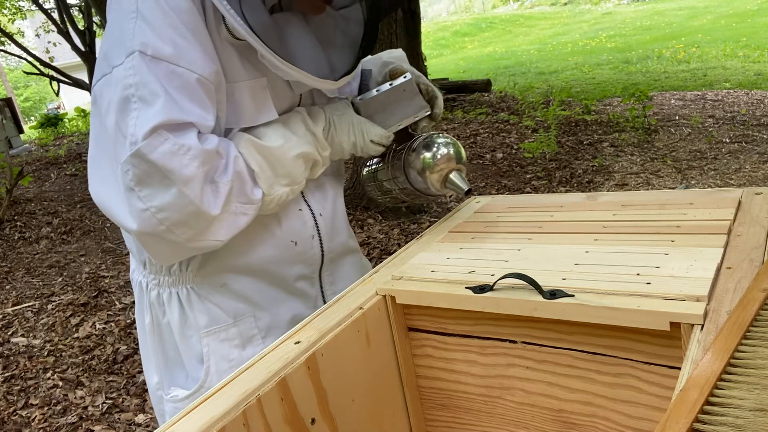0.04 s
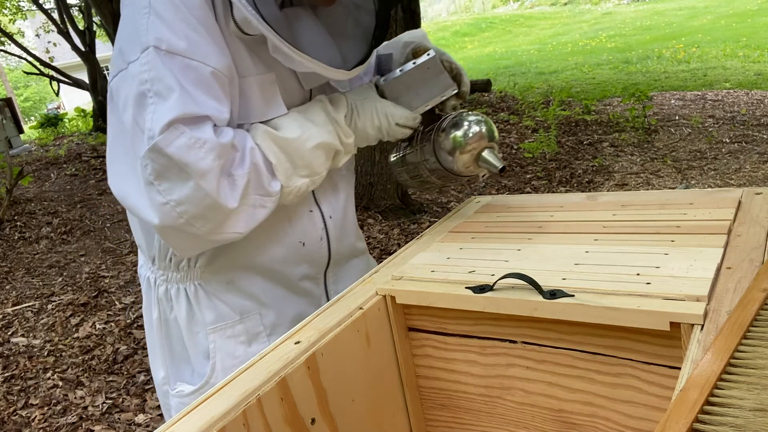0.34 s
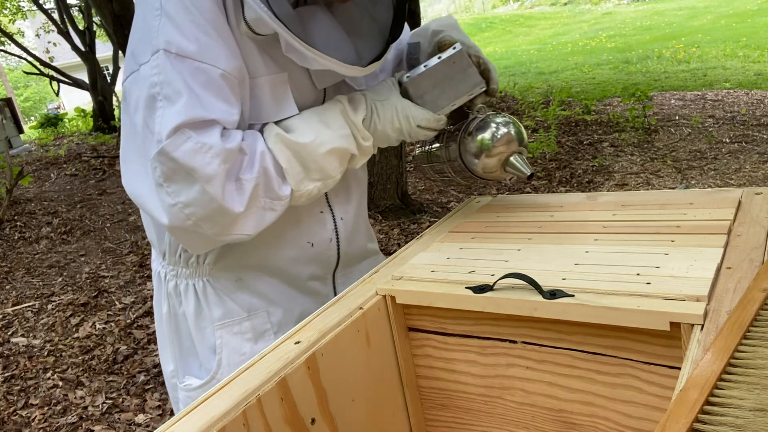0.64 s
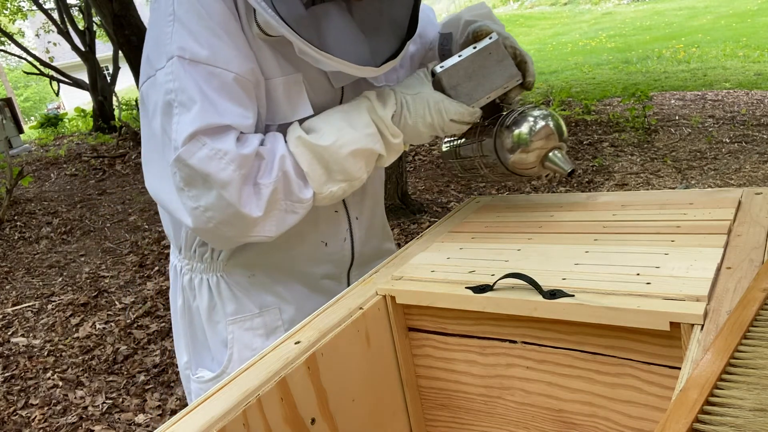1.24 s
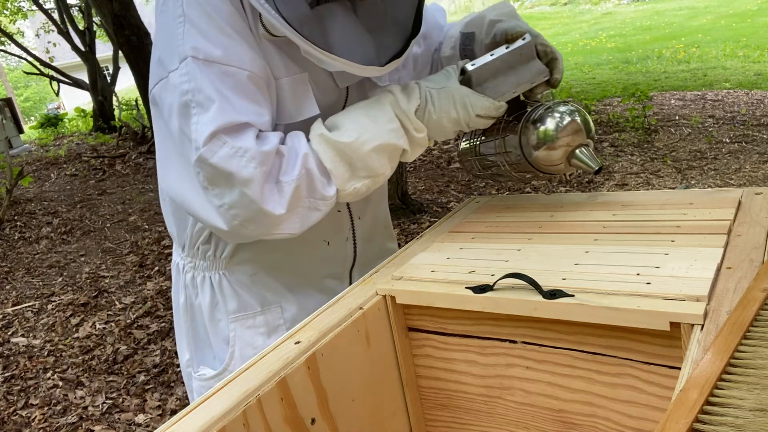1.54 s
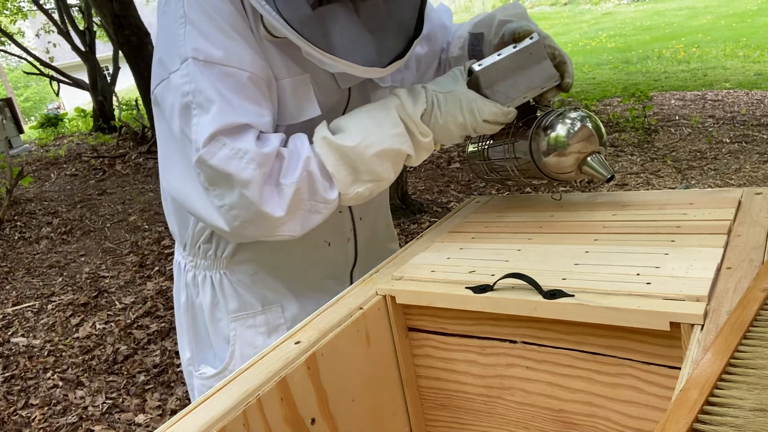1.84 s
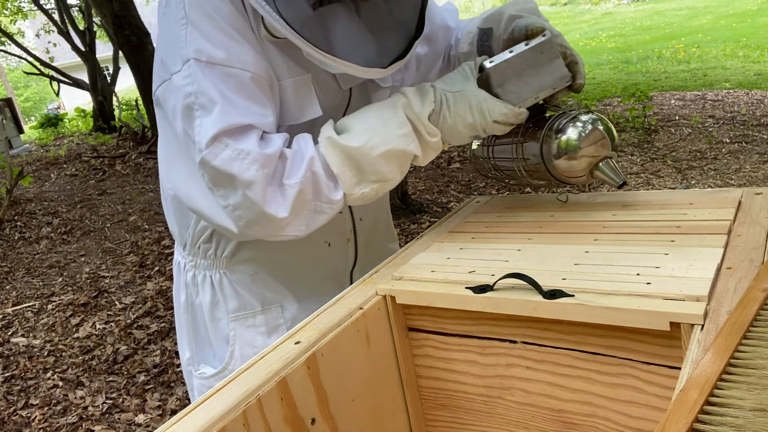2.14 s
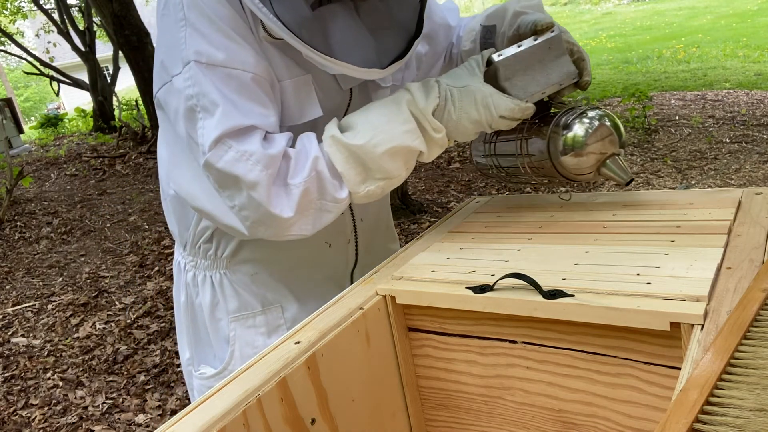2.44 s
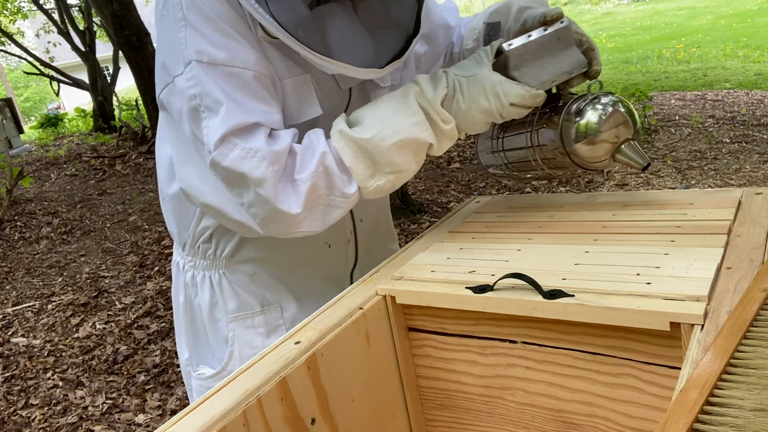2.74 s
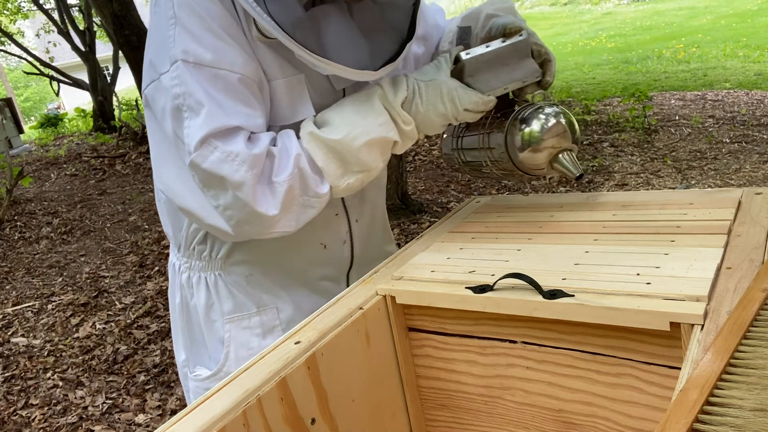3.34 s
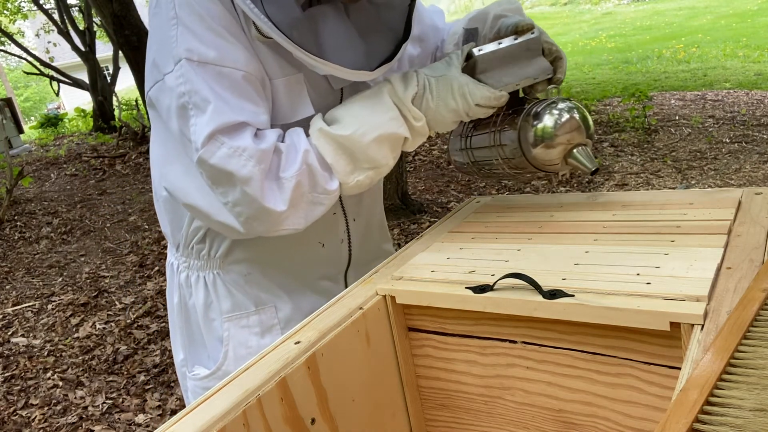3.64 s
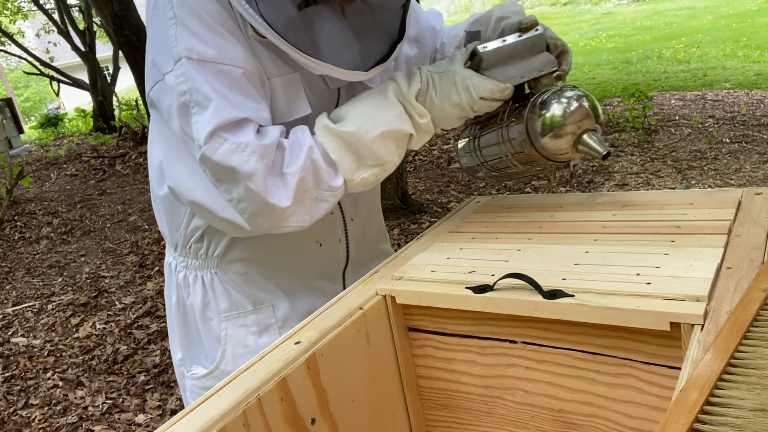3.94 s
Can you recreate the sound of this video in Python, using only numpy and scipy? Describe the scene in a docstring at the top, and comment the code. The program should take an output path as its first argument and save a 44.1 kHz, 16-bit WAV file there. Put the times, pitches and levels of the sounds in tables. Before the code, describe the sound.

A bee smoker puffs air in breathy whooshes that quicken, with faint bird chirps behind.

```python
"""A bee smoker is pumped in a yard, over a distant hum and a small bird chirping in triplets.
At first the strokes are slow and soft: each squeeze excites the hollow can and hisses out of the nozzle,
then the bellows refill with a softer rush. After a second they squeak once, and soon the air jet
adds a thin whistle. The pumping grows faster and harder, with a faint rustle and one click,
and in the second half stray air thumps on the microphone three times."""
import sys
import numpy as np
from scipy import signal
from scipy.fft import rfft, irfft
from scipy.io import wavfile

SR = 44100
rng = np.random.default_rng(int(sys.argv[2]) if len(sys.argv) > 2 else 0)


def put_to_file(sound):
    """Save the sound as 16-bit audio at rate SR, in the file named by the first command-line argument."""
    columns = np.atleast_2d(sound).T  # one column per channel
    safe = np.clip(columns, -1, 1)
    whole_steps = np.round(safe * 32767)
    wavfile.write(sys.argv[1], SR, whole_steps.astype(np.int16))


N = 176400
TIME, FREQS = np.arange(N) / SR, np.fft.rfftfreq(N, 1 / SR)

# Spectrum of the yard's background noise: frequency_hz, gain_db
YARD_SPECTRUM = [(20, -11), (55, 0), (110, 0), (175, -12.5), (245, -1.5), (340, -13.5), (490, -13.5),
                 (640, -29.5), (900, -22.5), (1500, -34.5), (4000, -42.5), (5200, -40.5), (8500, -48.5),
                 (16000, -63.5)]
# Course of that noise: time_s, level_db
YARD_LEVELS = [(0, -54), (1.3, -56), (2.3, -53), (4, -52.5)]
# Its likeness in the two channels: frequency_hz, coherence_ratio
YARD_COHERENCE = [(290, 0.76), (640, 0), (1400, 0)]
# Tones of a distant machine: pitch_hz, level_db
HUM_TONES = [(118.4, -66), (242.2, -63.5)]
# The bird's triplets: start_s
TRIPLET_STARTS = [.097, .365, 0.64, 0.901, 1.194, 1.505, 1.778, 2.031, 2.296, 2.596, 2.962, 3.412, 3.742]
# Faint rustles: start_s, length_s, centre_hz, level_db
RUSTLES = [(0.06, 0.36, 1380, -71.5), (1.227, 1, 2650, -76)]
# Air striking the microphone: start_s, length_s, level_db
BUFFETS = [(2.589, 0.072, -31), (3.15, 0.14, -40.5), (3.987, 0.16, -22)]
# Click of the bellows: start_s, level_db
CLICKS = [(1.983, -61.5)]
# Intake strokes: start_s, length_s, rush_db, hiss_db
REFILLS = [(0.44, 0.2, -73.5, -90), (1.03, 0.13, -68.5, -80), (1.55, 0.19, -63.5, -64),
           (1.982, 0.18, -59, -69), (2.311, 0.21, -58.5, -57), (2.688, 0.16, -57, -60),
           (2.984, 0.18, -60, -59), (3.288, 0.21, -58, -55.5), (3.604, 0.2, -55, -52),
           (3.928, 0.26, -60.5, -54)]
# Jet tones at the nozzle or inlet: start_s, length_s, top_hz, level_db
WHISTLES = [(1.408, .115, 10550, -67), (1.832, .105, 10450, -62), (2.163, .125, 11450, -60),
            (2.56, .108, 10750, -64), (2.853, .108, 11500, -60), (3.147, .122, 12300, -62),
            (3.472, .115, 12500, -61), (3.645, .075, 7950, -63)]
# Outward strokes: start_s, length_s, can_db, rush_db, hiss_db
SQUEEZES = [(-.07, 0.13, -42, -62.5, -85), (0.279, 0.18, -45.5, -66, -84), (0.857, 0.16, -40.5, -56, -72),
            (1.388, 0.18, -38.5, -52.5, -62), (1.806, 0.18, -40.5, -53, -63),
            (2.149, 0.18, -36.5, -47, -56.5), (2.536, 0.16, -38, -50, -61.5),
            (2.834, 0.17, -36.5, -47.5, -57), (3.134, 0.17, -36.5, -47, -54.5),
            (3.457, 0.16, -36.5, -45.5, -53.5), (3.795, 0.16, -39, -43, -53)]
# Spectra of the airflow in the inlet, can and nozzle: frequency_hz, gain_db
INLET_RUSH = [(150, -3.5), (420, 5.5), (680, -13), (1200, 4), (1600, -8.5), (2100, 5), (3000, -13.5),
              (8000, -20.5)]
INLET_HISS = [(1500, -27), (3300, -2.5), (6200, -4), (7300, -15.5), (7800, 2), (10000, -2), (11800, -16),
              (16000, -48)]
CAN_BODY = [(30, -26.5), (110, -3.5), (175, -14), (255, 6), (320, -5), (470, -17.5), (580, -24.5),
            (2000, -57)]
NOZZLE_RUSH = [(300, -21), (730, -19), (860, 7.5), (1020, -6), (1250, -7.5), (2050, -11), (2480, -16),
               (3000, -24.5), (12000, -50)]
NOZZLE_HISS = [(1500, -65), (3200, -2), (4100, -1), (6200, 2), (7200, 0), (7800, 6.5), (10500, 3),
               (12300, -16), (16000, -52)]
NOZZLE_FIZZ = [(9000, -36), (13000, 0), (15500, 2)]
# The smoker's phase difference at the two microphone ports: frequency_hz, left_lead_rad
PORT_PHASE = [(100, 0), (450, -.5), (620, -2.6), (1200, -9), (1800, -12.2), (2500, -12.6), (3900, -18.7),
              (4500, -22), (5700, -19.3), (7700, -25.1), (9200, -28.1), (11700, -31.2), (14200, -34.3)]
# Its level difference there: frequency_hz, left_minus_right_db
PORT_BALANCE = [(100, 2), (220, -5.5), (800, 2), (1200, -12), (1450, 0), (3400, 0.5), (4050, 9), (4800, 0),
                (8700, -4.5), (9800, -0.5)]
# Its likeness there: frequency_hz, coherence_ratio
PORT_COHERENCE = [(60, 0.86), (250, 1), (1400, 0.58), (2100, 0.87), (3000, 0.34), (7200, 0.95), (9300, 1)]


def amp(db):
    """Amplitude grows tenfold for every 20 dB."""
    return 10 ** (np.asarray(db) / 20)


def unit_rms(x):
    """Normalisation to a mean power of 1."""
    return x / np.sqrt(np.mean(x ** 2) + 1e-20)


def white_noise():
    """Two uncorrelated channels with a flat spectrum."""
    return rng.standard_normal((2, N))


def per_bin(table):
    """Interpolation over log frequency gives a value at every bin."""
    hz, value = np.transpose(table)
    return np.interp(np.log(FREQS + 1), np.log(hz + 1), value)


def drift(rate_hz):
    """Low-pass filtering turns noise into a random wander of rms 1."""
    return unit_rms(irfft(rfft(rng.standard_normal(N)) / (1 + (FREQS / rate_hz) ** 4), N))


def cohere(noise, coherence):
    """Partial coherence: two independent channels become two spectra with a common part."""
    left, other = rfft(noise)
    common = per_bin(coherence)
    return np.array([left, common * left + np.sqrt(1 - common ** 2) * other])


def at_smoker(noise):
    """Phase and level differences between the microphone ports localise a sound at the smoker."""
    half_difference = amp(per_bin(PORT_BALANCE) / 2) * np.exp(.5j * per_bin(PORT_PHASE))
    response = np.array([half_difference, 1 / half_difference])
    response /= np.sqrt(np.mean(abs(response) ** 2, axis=0))
    return irfft(cohere(noise, PORT_COHERENCE) * response, N)


def coloured_noise(spectrum, spacing_hz, ripple_db=2.2):
    """Source and filter: the smoker's broad resonances and many fine ones colour white noise."""
    knots_hz = np.arange(0, SR / 2, spacing_hz)
    ripple = np.interp(FREQS, knots_hz, rng.standard_normal(len(knots_hz)))
    response = amp(per_bin(spectrum) + ripple_db * ripple)
    return unit_rms(at_smoker(irfft(rfft(white_noise()) * response, N)))


def resonant_noise(hz, width_hz, order=2):
    """A resonance passes noise around the curve hz; a higher order has steeper sides."""
    carrier = np.exp(2j * np.pi * np.cumsum(hz) / SR)
    pole = np.exp(-np.pi * width_hz / SR)
    baseband = white_noise() / carrier
    for _ in range(order):
        baseband = signal.lfilter([1 - pole], [1, -pole], baseband)
    return unit_rms((carrier * baseband).real)


def swell(start_s, length_s, rise, fall):
    """An envelope within 0-1; rise and fall are shares of its length."""
    progress = (TIME - start_s) / length_s
    attack = np.sin(np.pi / 2 * np.clip(progress / rise, 0, 1))
    release = np.sin(np.pi / 2 * np.clip((1 - progress) / fall, 0, 1))
    return attack * release


def flow_gain(flows, levels_db, power):
    """Flow noise follows a power law of the flow, summed here over the strokes."""
    return amp(levels_db) @ flows ** power


def yard():
    """Broadband rumble and leaf hiss lie under a machine hum modulated in pitch and level."""
    wash = unit_rms(irfft(cohere(white_noise(), YARD_COHERENCE) * amp(per_bin(YARD_SPECTRUM)), N))
    hum = np.zeros(N)
    for pitch_hz, level_db in HUM_TONES:
        gain = amp(level_db + 3 * drift(rate_hz=0.67))
        hz = pitch_hz * (1 + 0.0136 * drift(rate_hz=11.8))
        hum += gain * unit_rms(np.sin(2 * np.pi * np.cumsum(hz) / SR))
    wash_db = np.interp(TIME, *np.transpose(YARD_LEVELS)) + 0.73 * drift(rate_hz=3.1)
    return (wash * amp(wash_db) + hum) * amp([[-1.2], [1.2]])  # louder on the right


def bird(note_s=0.0226, step_s=0.036, high_hz=5320, low_hz=4627, level_db=-71, echo_s=0.062, echo_db=3):
    """Triplets of falling tones reverberate by scattering from the trees."""
    song = np.zeros(N)
    progress = np.arange(0, 1, 1 / (note_s * SR))
    glide_hz = high_hz + (low_hz - high_hz) * progress ** 2
    for start_s in np.add.outer(TRIPLET_STARTS, step_s * np.arange(3)).ravel():
        accent_db, detune = rng.standard_normal(2)
        hz = glide_hz * (1 + .005 * detune)
        note = np.sin(np.pi * progress) * np.sin(2 * np.pi * np.cumsum(hz) / SR)
        song[round(start_s * SR):][:len(note)] += amp(level_db + accent_db) * note
    trees = rng.standard_normal((2, SR // 2)) * np.exp(-TIME[:SR // 2] / echo_s)
    song *= amp(2 * drift(rate_hz=300))  # the notes flicker
    echo = signal.oaconvolve(song[None], trees / np.linalg.norm(trees[0]), axes=1)[:, :N]
    return song + amp(echo_db) * echo


def rustles():
    """Band-limited noise swells softly, like cloth shifting."""
    return sum(amp(db) * resonant_noise(np.full(N, hz), width_hz=1100)
               * swell(start_s, length_s, rise=0.32, fall=0.8) for start_s, length_s, hz, db in RUSTLES)


def buffets():
    """Pressure fluctuations of stray air on the microphone make low thumps."""
    response = amp(per_bin([(15, -30), (52, 23), (110, 1), (400, -52)]))
    rumble = unit_rms(irfft(cohere(white_noise(), coherence=[(50, 0.69)]) * response, N))
    return rumble * sum(amp(db) * swell(*span, rise=0.38, fall=0.68) for *span, db in BUFFETS)


def bellows_click(decay_s=0.0069):
    """A damped transient: the bellows give a dry click that decays exponentially."""
    envelope = sum(amp(db) * (TIME >= s) * np.exp(-abs(TIME - s) / decay_s) for s, db in CLICKS)
    spectrum = [(500, -12), (1800, -6), (6000, 5), (14000, -30)]
    return envelope * coloured_noise(spectrum, spacing_hz=207, ripple_db=15)


def bellows_squeak(start_s=1.05, length_s=0.082, high_hz=2100, low_hz=1650, level_db=-69):
    """A narrow resonance glides down as the bellows open."""
    hz = np.interp(TIME, [start_s, start_s + length_s], [high_hz, low_hz])
    envelope = amp(level_db) * swell(start_s, length_s, rise=.5, fall=.5)
    return envelope * at_smoker(resonant_noise(hz, width_hz=260))


def refills():
    """Suction: the spring opens the bellows and draws turbulent air through the inlet."""
    _, _, rush_db, hiss_db = np.transpose(REFILLS)
    flows = np.array([swell(*row[:2], rise=0.49, fall=0.84) for row in REFILLS])
    rush = coloured_noise(INLET_RUSH, spacing_hz=59.8) * flow_gain(flows, rush_db, power=1.6)
    # Each refill hisses with a colour of its own.
    hiss = sum(coloured_noise(INLET_HISS, spacing_hz=337) * amp(db) * flow ** 2.6
               for flow, db in zip(flows, hiss_db))
    return (rush + hiss) * amp(1.53 * drift(rate_hz=93))


def whistles(rest_hz=7200):
    """A jet tone follows the flow: its pitch arches up and back, and it is clearest early."""
    _, _, top_hz, level_db = np.transpose(WHISTLES)
    flows = np.array([swell(*row[:2], rise=.38, fall=.5) for row in WHISTLES])
    clarity = np.array([swell(*row[:2], rise=.2, fall=1) for row in WHISTLES])
    hz = rest_hz + (top_hz - rest_hz) @ flows
    hz *= 1 + .009 * drift(rate_hz=90)
    envelope = amp(level_db) @ (clarity * np.sqrt(flows))
    return envelope * at_smoker(resonant_noise(hz, width_hz=380))


def can_resonance(flows, can_db, rest_hz=235, top_hz=345, note_db=-6):
    """Cavity resonance: air excites the can, whose hollow note climbs with the flow."""
    hz = rest_hz + (top_hz - rest_hz) * flows.sum(0) ** 2
    note = amp(note_db) * at_smoker(resonant_noise(hz, width_hz=170, order=4))
    body = coloured_noise(CAN_BODY, spacing_hz=42)
    return (body + note) * flow_gain(flows, can_db, power=1.07) * amp(1.52 * drift(rate_hz=41))


def nozzle_jet(flows, rush_db, hiss_db, onset_flow=.3, hard_puff_db=-54.5):
    """Jet turbulence rushes at any flow, hisses above a threshold and brightens on hard puffs."""
    jets = np.clip((flows - onset_flow) / (1 - onset_flow), 0, 1)
    fizz_db = hard_puff_db + 1.5 * (hiss_db - hard_puff_db)  # the top octave grows fastest
    rush = coloured_noise(NOZZLE_RUSH, spacing_hz=46, ripple_db=3.2)
    rush *= flow_gain(flows, rush_db, power=2.12)
    hiss = coloured_noise(NOZZLE_HISS, spacing_hz=121.8) * flow_gain(jets, hiss_db, power=1.35)
    fizz = coloured_noise(NOZZLE_FIZZ, spacing_hz=122) * flow_gain(jets, fizz_db, power=2.4)
    return (rush + hiss + fizz) * amp(drift(rate_hz=105))


def squeezes():
    """Compression of the bellows drives one flow through both the can and the nozzle."""
    _, _, can_db, rush_db, hiss_db = np.transpose(SQUEEZES)
    flows = np.array([swell(*row[:2], rise=0.41, fall=0.61) for row in SQUEEZES])
    return can_resonance(flows, can_db) + nozzle_jet(flows, rush_db, hiss_db)


def scene():
    """Superposition: the pressures of the background and the smoker add."""
    background = yard() + bird() + rustles() + buffets()
    return background + bellows_click() + bellows_squeak() + refills() + whistles() + squeezes()


def record(dry):
    """A low-pass filter limits the bandwidth."""
    low_pass = signal.firwin(511, cutoff=15750, window=("kaiser", 9), fs=SR)
    return signal.oaconvolve(dry, low_pass[None], "same")


dry = scene()
out = record(dry)
put_to_file(out)
```